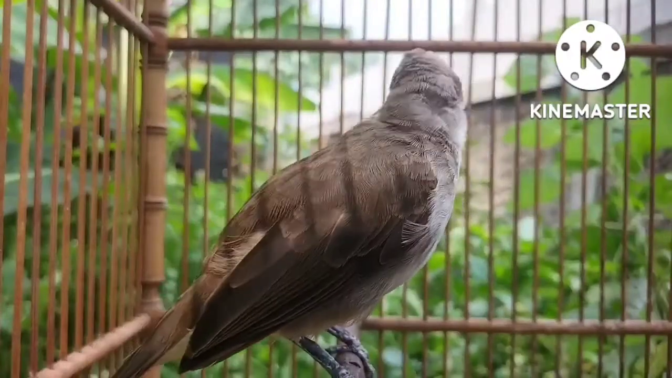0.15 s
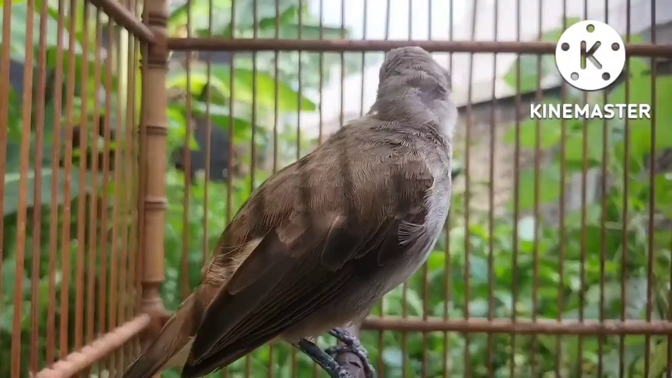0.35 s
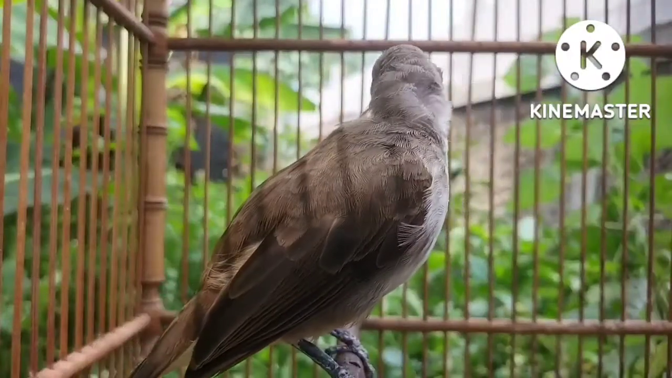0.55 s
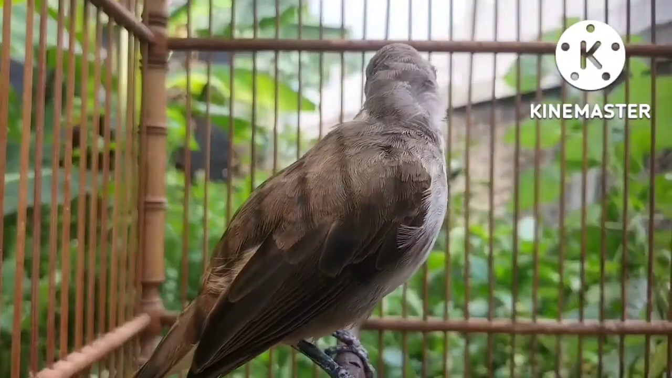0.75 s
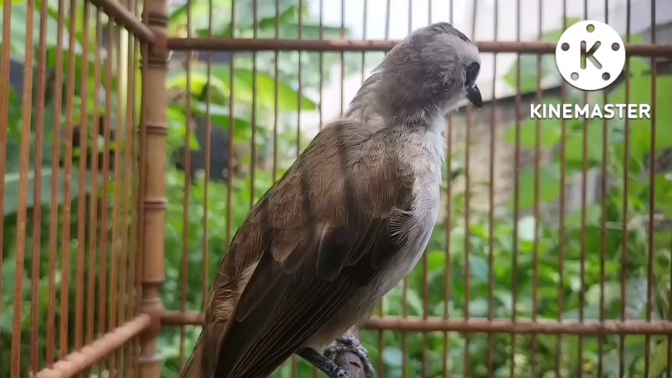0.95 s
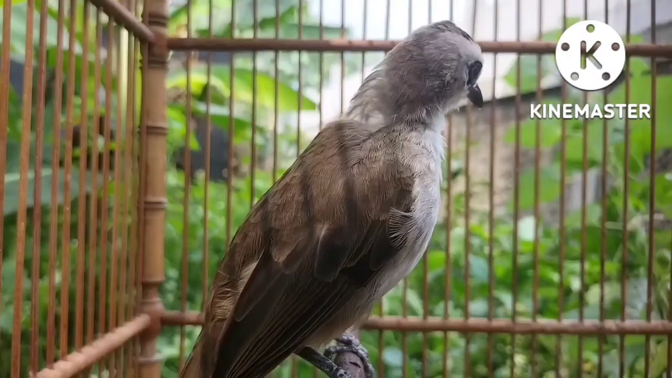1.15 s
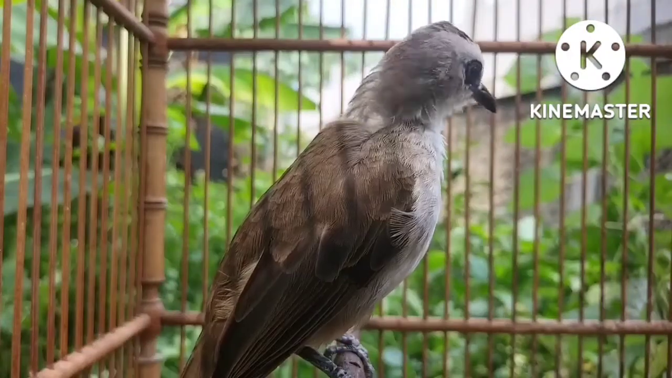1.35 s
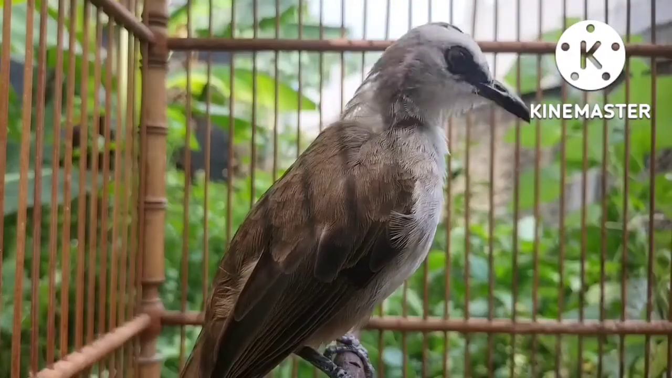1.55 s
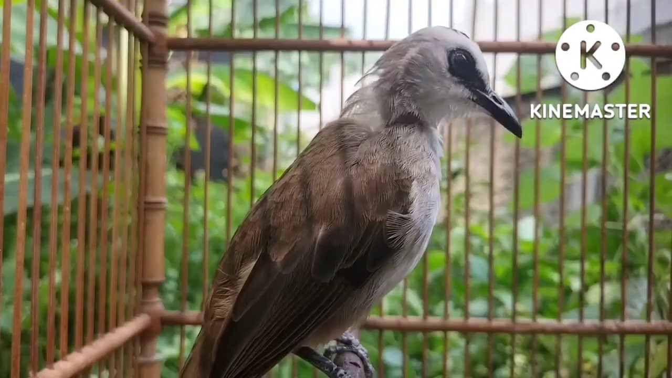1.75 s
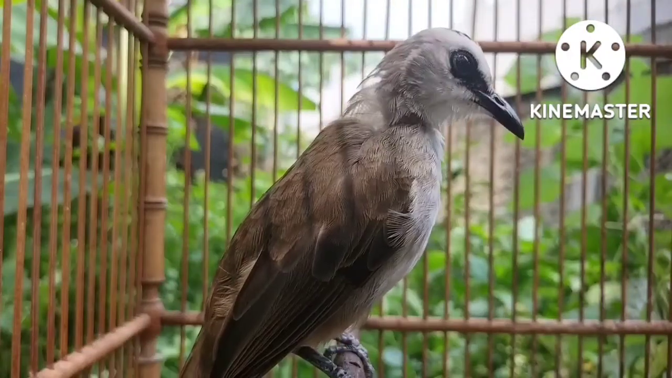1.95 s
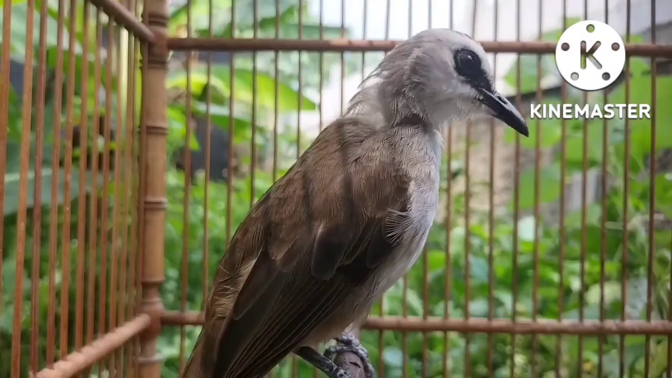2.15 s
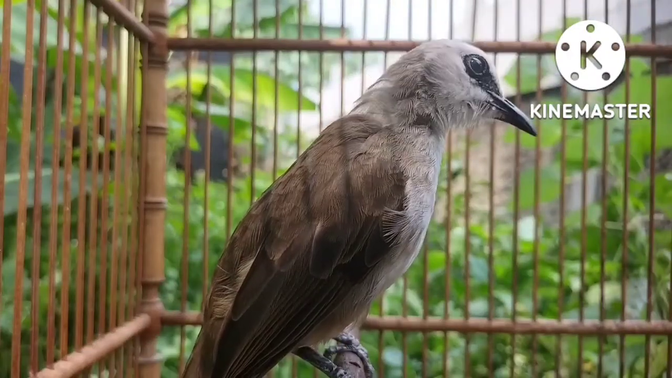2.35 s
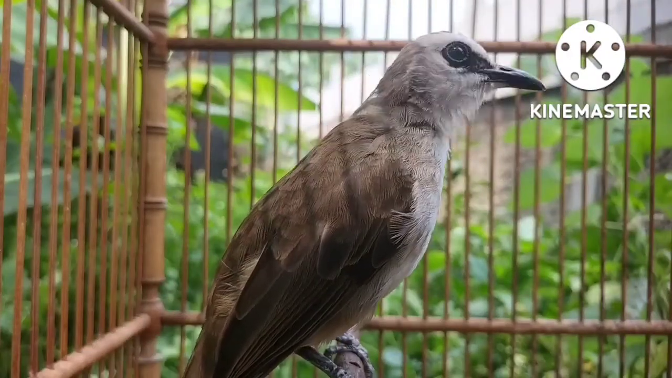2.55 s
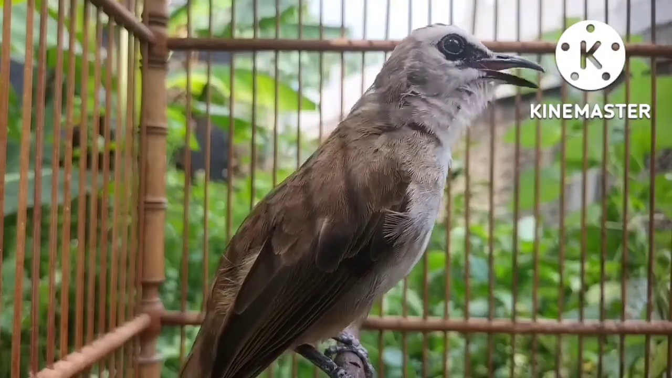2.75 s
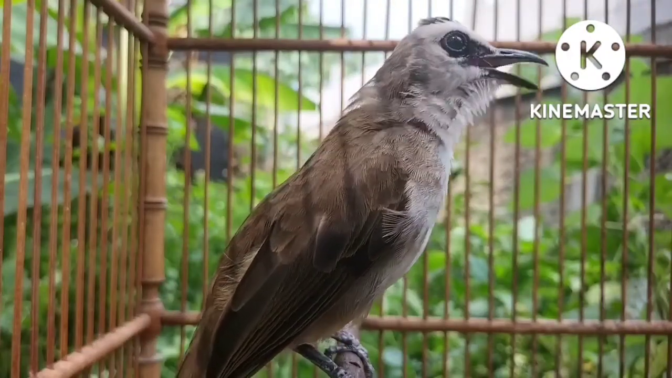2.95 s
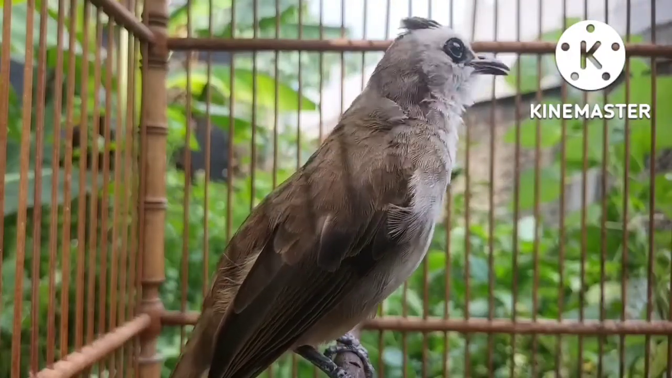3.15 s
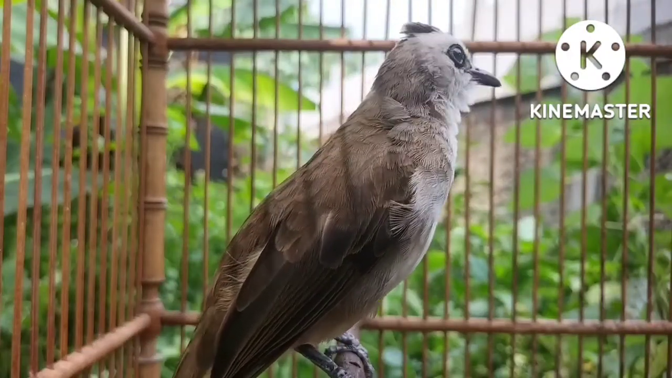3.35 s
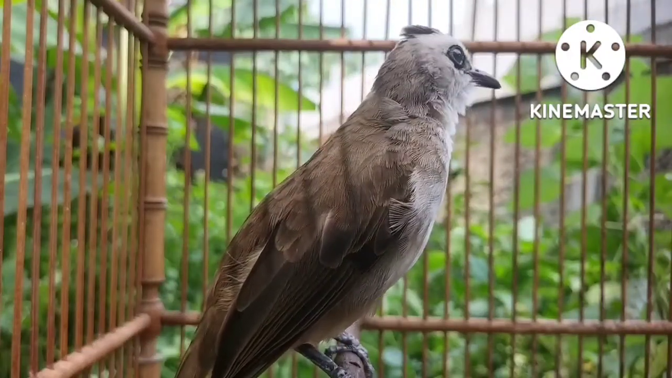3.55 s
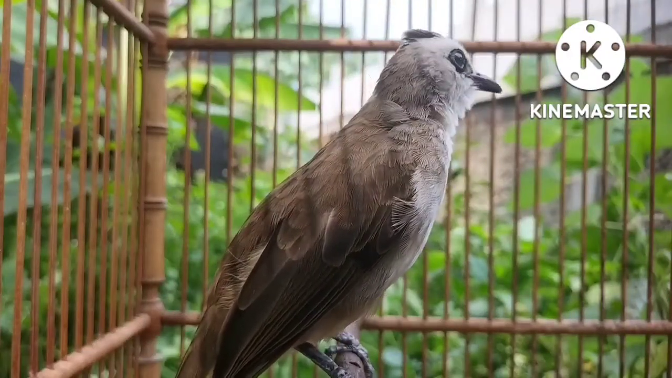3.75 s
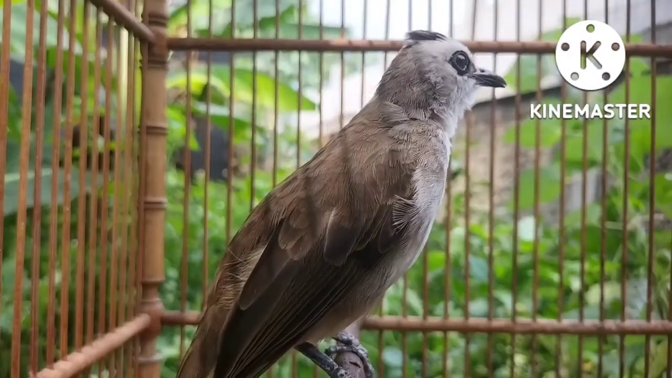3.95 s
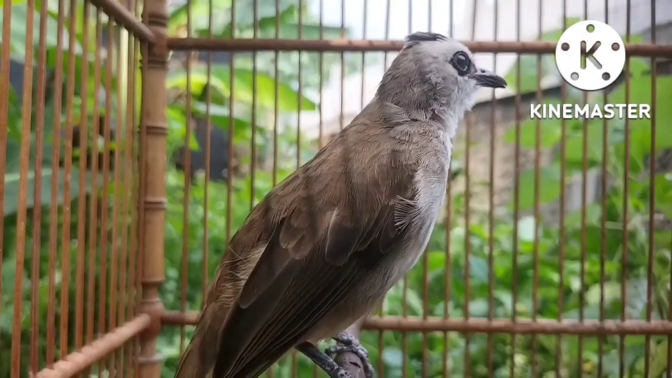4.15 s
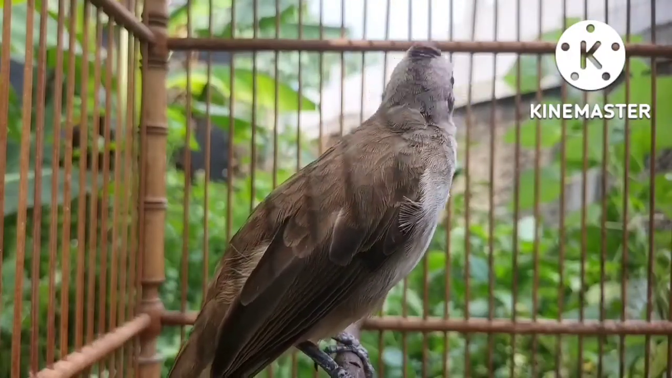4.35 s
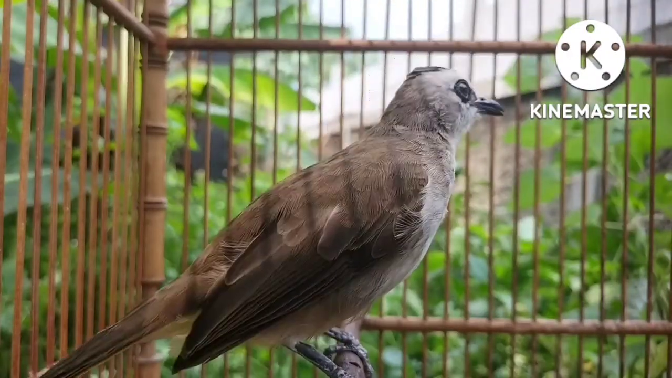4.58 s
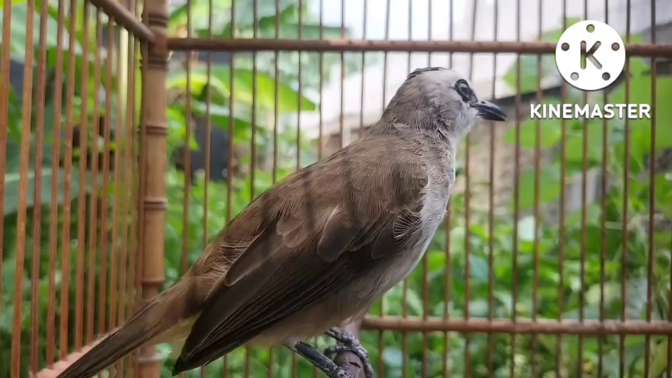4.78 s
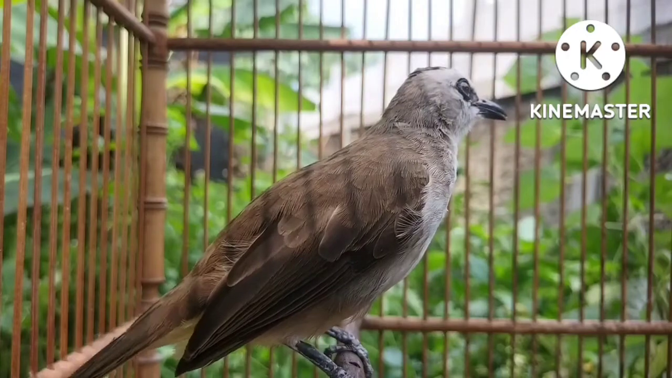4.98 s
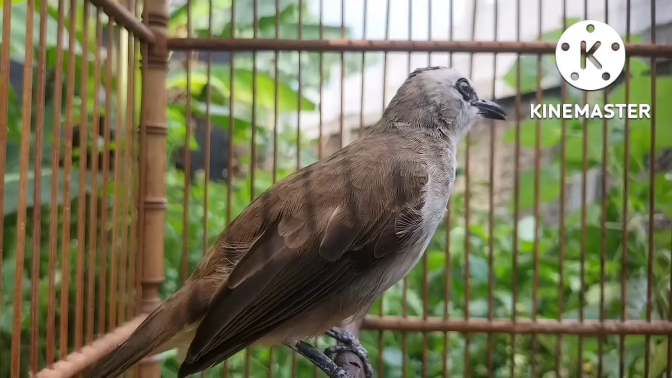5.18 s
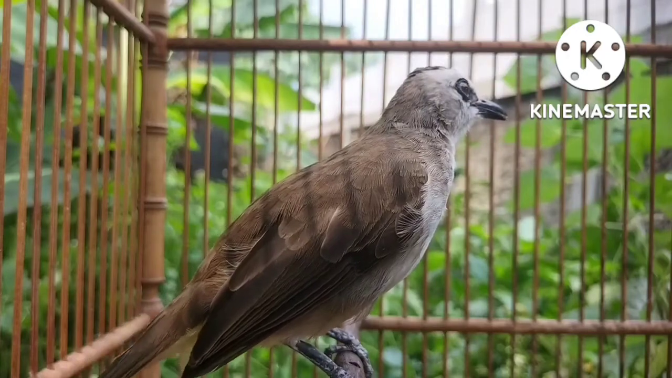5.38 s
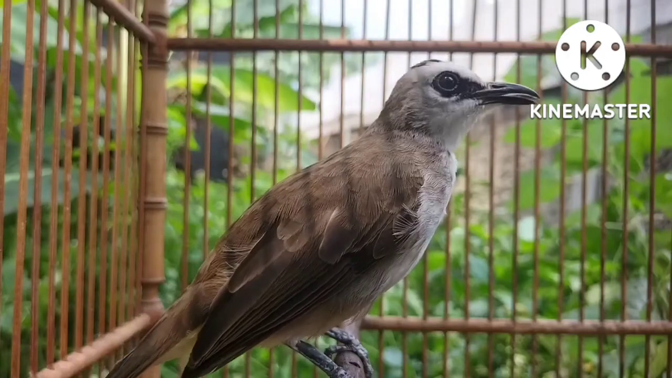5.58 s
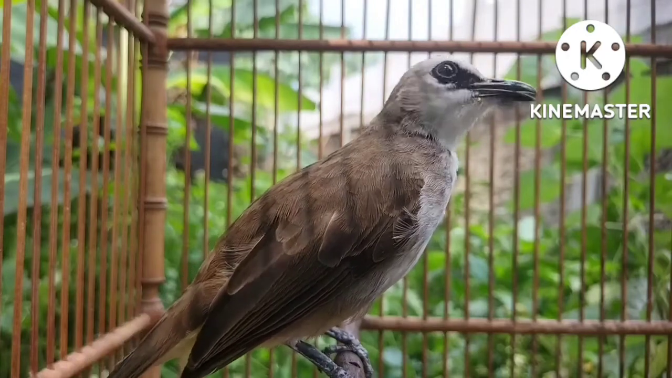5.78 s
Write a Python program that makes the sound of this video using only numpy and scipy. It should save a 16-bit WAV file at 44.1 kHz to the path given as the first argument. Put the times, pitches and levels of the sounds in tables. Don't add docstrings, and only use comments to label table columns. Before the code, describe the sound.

A caged songbird gives three loud, sharp arched chirps over quiet garden hush, after low wind gusts and a hollow wooden drag.

```python
import sys
import numpy as np
from scipy import signal
from scipy.fft import rfft, irfft
from scipy.io import wavfile
from scipy.ndimage import uniform_filter1d

SR = 44100
rng = np.random.default_rng(int(sys.argv[2]) if len(sys.argv) > 2 else 0)


def store_wav(level_fs):
    pcm = np.round(np.clip(np.atleast_2d(level_fs), -1, 1) * 32767)
    wavfile.write(sys.argv[1], SR, pcm.T.astype(np.int16))


def undo_db(level):
    steps = np.asarray(level, float) / 20
    return 10 ** steps


N = 256662
T = np.arange(N) / SR

# frequency in Hz, density in dB per Hz.
HUSH_COLOUR = [(15, -69.5), (25, -32.5), (45, -10.5), (69, -2), (124, -12), (145, -12.5), (241, -19),
               (480, -26.5), (1060, -29), (1900, -37.5), (2850, -35), (5390, -41.5), (6780, -40.5),
               (8970, -47), (11000, -57), (15500, -59), (16200, -100)]
# frequency in Hz, gain in dB.
HUSH_TOP = [(6000, -2.5), (7000, -1.5), (8200, -4), (8700, -8), (11000, -4.5)]
# start in seconds, time held in seconds, level in dB.
VEHICLES = [(.22, 0.16, -64), (.5, .1, -66), (.86, .28, -63.5), (2.15, .05, -59.5), (2.7, 0.13, -66.5),
            (3.15, .12, -66), (3.88, 0.062, -67.5), (4.7, .35, -64), (5.2, 0.19, -69.5),
            (5.62, 0.049, -64.5)]
# frequency in Hz, density in dB per Hz.
WIND_COLOUR = [(12, -39), (20, -13), (151, 3), (262, -9.5), (295, -14.5), (468, -18.5), (594, -37),
               (700, -33), (910, -86.5), (1540, -120)]
# start in seconds, time held in seconds, level in dB.
GUSTS = [(1.005, 0.013, -58.5), (1.085, 0.059, -53), (1.2, .015, -49), (1.25, 0.67, -61.5),
         (1.91, 0.13, -54), (2.125, 0.011, -49), (2.205, 0.017, -48.5), (2.34, .01, -55.5),
         (2.36, 0.26, -64), (2.96, 0.017, -58), (3.3, 0.045, -59.5)]

# start in seconds, length in seconds, first pitch in Hz, last pitch in Hz, level in dB.
FAR_NOTES = [(3.85, .10, 2280, 2250, -78), (4.10, .10, 2250, 2450, -77), (4.19, .15, 2450, 2380, -74),
             (5.25, .11, 7150, 7250, -75), (5.36, .17, 5500, 5480, -74), (5.43, .07, 2120, 2100, -79),
             (5.40, .10, 7400, 7350, -81), (5.00, .10, 1080, 1060, -74), (5.2, .07, 960, 940, -73),
             (5.43, .07, 2650, 2600, -79), (5.48, .10, 760, 750, -73), (1.22, .04, 3250, 3050, -73),
             (2.11, .06, 3600, 3520, -69), (2.17, .05, 3100, 2900, -70), (2.09, .04, 6050, 6000, -68)]

# start in seconds, falter in seconds, stop in seconds, level in dB.
KATYDID_BOUTS = [
    (-.1, 1.85, 2.095, -59.5),
    (2.662, 5.58, 5.705, -58.5),
]
# time in seconds, chirps a second in Hz.
KATYDID_PACE = [(0, 23.3), (.7, 23.42), (1.84, 23.1), (2.09, 23.5), (2.655, 23.5), (2.665, 24.5),
                (3.5, 23.83), (4.4, 23.6), (4.9, 22.8)]
STROKES_DB = [-11, -3, -2.5, -1]
# frequency in Hz, gain in dB.
WING = [(6000, -61), (6700, -28), (8000, -28), (8500, -61.5), (11100, -55.5), (11500, -26), (11900, -20),
        (12400, -21.5), (13200, -20.5), (13900, -12.5), (14400, -8), (14850, -0.5), (15400, -3),
        (15650, -14.5), (15900, -60)]

# start in seconds, time held in seconds, deep modes in dB, upper modes in dB.
SHOVES = [(1.74, .62, -73, -70.5), (1.822, 0.017, -50, -59), (1.85, 0.43, -50.5, -62),
          (1.945, 0.015, -45, -50.5), (2.02, 0.0055, -45, -48.5), (2.089, 0.034, -45.5, -53.5),
          (2.23, 0.017, -50, -68), (2.57, .15, -68.5, -72), (2.73, .008, -62, -60), (2.975, .04, -58, -62),
          (3.04, 0.055, -65, -60.5), (3.34, 0.019, -67, -71)]
# frequency in Hz, width in Hz, level in dB.
WOOD_DEEP = [(830, 40, -6.5), (887, 48, 3)]
# frequency in Hz, width in Hz, level in dB.
WOOD_UPPER = [(1096.4, 52, 4.5), (1334, 88, -2), (1450, 120, -6), (1570, 15, -6.5)]
# frequency in Hz, width in Hz, level in dB.
WOOD_HISS = [(503, 240, 8), (2400, 470, -1.5), (3300, 1100, 0.5), (5955, 700, 0), (7300, 970, -8.5)]

# start in seconds, peak in dB, centre in Hz, 60 dB ring time in seconds.
TICKS = [(2.4304, -60, 5000, 0.0062), (2.4444, -58, 3500, .006), (2.510, -45, 4200, 0.01),
         (2.5544, -56.5, 5500, 0.0054), (2.5864, -54.5, 5540, .005), (2.6184, -59.5, 6000, .005),
         (2.6814, -55, 6000, .005), (5.2274, -64.5, 2500, .01)]
# start in seconds, peak in dB, centre in Hz, 60 dB ring time in seconds.
GULPS = [
    (2.750, -46.5, 2700, 0.017),
    (3.0815, -36, 1620, .012),
    (3.0852, -31.5, 1900, .014),
    (3.0978, -29, 2400, .01),
    (3.1047, -35.5, 2567, .01),
]
# frequency in Hz, width in Hz, level in dB.
WIPE_BODY = [(6930, 690, -1), (1977, 360, -3.5), (2700, 450, -8), (3500, 570, -9)]

# time in seconds, syrinx pitch in Hz, effort in dB.
CALLS = [
    [(2.761, 830, -30.5), (2.770, 898, -27.5), (2.776, 1425, -21.5), (2.781, 1830, -3.5),
     (2.784, 1854, -4.5), (2.788, 1648, -7.5), (2.793, 1310, -5), (2.7975, 1103, -1.1), (2.804, 900, -15)],
    [(2.859, 1244, -15), (2.866, 1121, -12.5), (2.871, 1363, -7), (2.874, 1570, 1), (2.880, 1819, 4.5),
     (2.890, 1450, 0.8), (2.896, 1255, -3.5), (2.902, 1050, -17.5)],
    [(3.1115, 818.7, -12), (3.122, 1062, -2.5), (3.130, 1218, 4), (3.135, 1290, 6.5), (3.138, 1698, 2.5),
     (3.143, 1588, 1.5), (3.151, 1275, 8.5), (3.154, 1022, -6.5), (3.163, 863, -6.5)],
]
THROAT_REST_HZ = [3350, 2980, 2894]
OVERTONES_DB = [4, 0, -1.5, -6, -20.5, -26, -32.5]
# frequency in Hz, gain in dB.
THROAT = [(700, -46.5), (1000, -33), (1300, -19), (1700, -18.5), (2000, -14), (2400, 0), (3000, 1),
          (3600, -4.5), (4200, -12.5), (5000, -24.5), (7000, -21), (9000, -41.5), (12000, -69.5)]
# delay in seconds, level in dB.
ECHOES = [(.0055, -16), (.009, -23), (.014, -25), (.021, -28.5)]


def unit(x):
    return x / np.sqrt(np.mean(x ** 2))


def columns(table):
    s, *cols = np.transpose(table)
    return [np.interp(T, s, c) for c in cols]


def during(table):
    return np.clip(np.minimum(T - table[0][0], table[-1][0] - T) / .008, 0, 1)


def decay(t, t60):
    return 1000. ** (-t / t60)


def tone(hz):
    return np.sin(2 * np.pi * np.cumsum(hz) / SR)


def lowpass(x, hz):
    return signal.sosfilt(signal.butter(6, hz, fs=SR, output="sos"), x)


def gain_at(hz, points):
    f, db = np.transpose(points)
    return undo_db(np.interp(np.log(np.maximum(hz, 1)), np.log(f), db))


def shaped(x, points):
    hz = np.arange(N // 2 + 1) * SR / N
    return unit(irfft(rfft(x) * gain_at(hz, points), N))


def coloured(points):
    return shaped(rng.standard_normal(N), points)


def ring(x, hz, width):
    return signal.lfilter(*signal.iirpeak(min(hz, .45 * SR), hz / width, SR), x)


def steep(x, hz, width):
    return ring(ring(x, hz, 1.5 * width), hz, 1.5 * width)


def body(x, modes):
    out = np.zeros(len(x))
    for k, (hz, width, db) in enumerate(modes):
        out += (-1) ** k * undo_db(db) * steep(x, hz, width)
    return unit(out)


def walk(rate):
    hold = max(int(SR / rate), 1)
    steps = np.repeat(rng.standard_normal(N // hold + 1), hold)[:N]
    return unit(uniform_filter1d(uniform_filter1d(steps, hold), hold))


def fits(modes, depth_db, rate):
    out = np.zeros(N)
    for hz, width, db in modes:
        out += undo_db(db + depth_db * walk(rate)) * steep(rng.standard_normal(N), hz, width)
    return unit(out)


def swells(rows, rise_s, fall_s):
    levels = []
    for s, held, db in rows:
        times = [s - 3 * rise_s, s, s + held, s + held + 3 * fall_s]
        levels.append(np.interp(T, times, [db - 90, db, db, db - 90]))
    return np.max(levels, axis=0)


def knocks(events, spread, rise_s):
    out, t = np.zeros(N + SR), T[:SR // 20]
    for s, db, hz, t60 in events:
        burst = rng.standard_normal(len(t)) * np.clip(t / rise_s, 0, 1) * decay(t, max(t60, .002))
        click = steep(steep(burst, hz, spread * hz), hz, spread * hz)
        start = int(s * SR)
        out[start:start + len(t)] += undo_db(db) * click / np.abs(click).max()
    return out[:N]


def garden():
    hush = shaped(coloured(HUSH_COLOUR), HUSH_TOP)
    low = signal.sosfiltfilt(signal.butter(2, 95, fs=SR, output="sos"), hush)
    traffic_db = np.maximum(swells(VEHICLES, rise_s=.38, fall_s=.64), -72) + 1.5
    return undo_db(-61 + .5 * walk(12)) * (hush - low) + undo_db(traffic_db) * unit(low)


def wind():
    buffet = undo_db(2 * walk(24.18)) * coloured(WIND_COLOUR + [(2500, -130)])
    gusts = undo_db(swells(GUSTS, rise_s=.069, fall_s=.2))
    puff = undo_db(swells([(3.14, .012, -42)], rise_s=.039, fall_s=.03065))
    return (gusts + puff) * buffet


def far_birds():
    out, shimmer, waver = np.zeros(N), 1 + .3 * walk(60), 1 + .006 * walk(400)
    for s, length, hz0, hz1, db in FAR_NOTES:
        u = np.clip((T - s) / length, 0, 1)
        out += undo_db(db) * np.sin(np.pi * u) * tone((hz0 + (hz1 - hz0) * u) * waver)
    leaves = rng.standard_normal(SR // 8) * decay(T[:SR // 8], .15)
    return signal.fftconvolve(out * shimmer, 1.15 * leaves / np.linalg.norm(leaves))[:N]


def katydid():
    chirp_hz, = columns(KATYDID_PACE)
    rows = []
    for s, falter, stop, db in KATYDID_BOUTS:
        rows += [(s, falter - s, db), (s, stop - s, db - 9.5)]
    level = undo_db(swells(rows, rise_s=.005, fall_s=.013))
    stroke = 4 * np.cumsum(chirp_hz) / SR + .3
    size = undo_db(np.array(STROKES_DB)[stroke.astype(int) % 4] + 1.3 * walk(90))
    swell = .5 + np.sin(np.pi * (stroke % 1)) ** 2
    return level * shaped(size * swell * rng.standard_normal(N), WING)


def drag():
    deep = fits(WOOD_DEEP, 1.4, 29.74)
    upper = fits(WOOD_UPPER, 2.5, 7.4)
    hiss = lowpass(fits(WOOD_HISS, 3, 40), 8300)
    rise_s, fall_s = .06, .09
    deep_db = swells([(s, held, db) for s, held, db, _ in SHOVES], rise_s, fall_s)
    upper_db = swells([(s, held, db) for s, held, _, db in SHOVES], rise_s, fall_s)
    upper_db = uniform_filter1d(upper_db, size=1500)
    hiss_db = swells([(2.08, .086, -61)], rise_s=.71, fall_s=.35)
    return undo_db(hiss_db) * hiss + undo_db(deep_db) * deep + undo_db(upper_db) * upper


def squeak():
    from_hz, to_hz, slip_s, slide_s = 4900, 4070, 2.508, .025
    hz = from_hz + (to_hz - from_hz) * np.clip((T - slip_s) / slide_s, 0, 1)
    low = walk(1500) * tone(hz)
    high = unit(steep(rng.standard_normal(N), 6000, 250))
    low_db = swells([(2.505, .075, -64)], rise_s=.045, fall_s=.06)
    high_db = swells([(2.525, .035, -67)], rise_s=.055, fall_s=.1)
    return undo_db(low_db) * low + undo_db(high_db) * high


def claw_and_beak():
    wipe_s, wipe_db, wipe_t60_s = 3.609, -54, .11
    fade = (T > wipe_s) * decay(np.maximum(T - wipe_s, 0), wipe_t60_s)
    wipe = undo_db(wipe_db) * fade * body(rng.standard_normal(N), WIPE_BODY)
    ticks = lowpass(knocks(TICKS, spread=1.0, rise_s=.0003), 8500)
    return ticks + knocks(GULPS, spread=.41, rise_s=.0015) + wipe


def syrinx_and_throat(call, rest_hz):
    (s0, hz0, db0), (s1, hz1, db1) = call[0], call[-1]
    attack_s, release_s, edge_db, release_sag_hz = .0056, .0065, -26.5, 90
    attack = (s0 - attack_s, hz0, db0 + edge_db)
    release = (s1 + release_s, hz1 - release_sag_hz, db1 + edge_db)
    call = [attack, *call, release]
    hz, effort_db = columns(call)
    crest_s = T[np.argmax(hz)]
    taut_hz, slack_span_hz, weak_db, weak_span_db = 1245, 200.7, -3, 25
    rising = .6 * np.clip((taut_hz - hz) / slack_span_hz, 0, 1)
    falling = (weak_db - effort_db) / weak_span_db
    slack = np.where(T < crest_s, rising, falling)
    rough = np.clip(np.clip(slack, 0, 1) + .14, 0, 1)
    nearest = uniform_filter1d(np.round(rest_hz / hz) * hz, size=130)
    throat_hz = rest_hz + .44 * (nearest - rest_hz)
    effort_db = effort_db - 9.5 * np.clip(1 - np.abs(T - crest_s) / .003, 0, 1)
    return during(call), hz, effort_db, rough, throat_hz


def songbird():
    out, wobble, flutter = np.zeros(N), walk(900), walk(1500)
    air = shaped(coloured(THROAT), [(1000, -16), (2200, -0.5), (5000, -1.5), (8000, 4.5)])
    for call, rest_hz in zip(CALLS, THROAT_REST_HZ):
        on, hz, effort_db, rough, throat_hz = syrinx_and_throat(call, rest_hz)
        hz = uniform_filter1d(hz, size=60) * (1 + .055 * rough * wobble)
        phase = 2 * np.pi * np.cumsum(hz) / SR
        detune = 3000 / throat_hz
        voice = np.zeros(N)
        for k, db in enumerate(OVERTONES_DB, 1):
            voice += undo_db(db) * gain_at(k * hz * detune, THROAT) * np.sin(k * phase)
        strength = 1 - .34 * rough + .27 * rough * flutter
        out += on * undo_db(effort_db) * (strength * voice + .29 * rough * air)
    return signal.sosfilt(signal.butter(3, 900, "high", fs=SR, output="sos"), out)


def porch(x):
    t = T[:SR // 2]
    noise = rng.standard_normal((4, len(t)))
    quick = noise[0] * decay(t, .029) * np.clip(t / .008, 0, 1)
    tail = steep(noise[1], 2620, 450) + 1.3 * steep(noise[2], 3200, 1100) * decay(t, 1.0)
    tail = tail * decay(t, .27) * np.clip(t / .017, 0, 1)
    scatter = np.diff(noise[3], prepend=0) * decay(t, .13) * np.clip(t / .01, 0, 1)
    answer = undo_db(-43.5) * quick + undo_db(-56) * tail + undo_db(-49.5) * scatter
    answer[0] = 1
    for lag, db in ECHOES:
        answer[int(lag * SR)] += undo_db(db)
    return signal.fftconvolve(x, answer)[:N]


def scene():
    cage = porch(songbird())
    nearby = katydid() + drag() + squeak() + claw_and_beak()
    background = far_birds() + garden() + wind()
    return (cage + nearby + background)[None]


def low_pass(x):
    return signal.sosfilt(signal.butter(12, 15630, fs=SR, output="sos"), x)


def record(dry):
    clipped = np.clip(dry, -.99, .99)
    thump = .0195 * uniform_filter1d(clipped ** 2, size=90)
    bent = signal.sosfilt(signal.butter(1, 15, "high", fs=SR, output="sos"), clipped + thump)
    return low_pass(bent)


dry = scene()
out = record(dry)
store_wav(out)
```